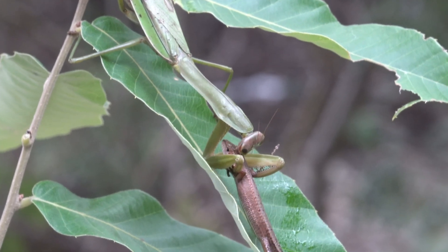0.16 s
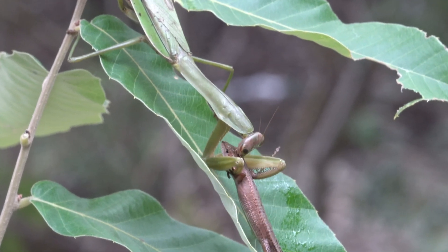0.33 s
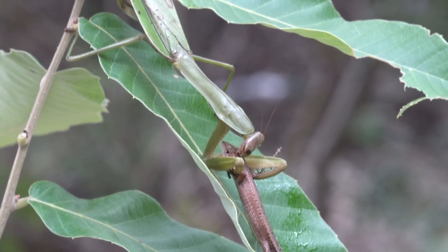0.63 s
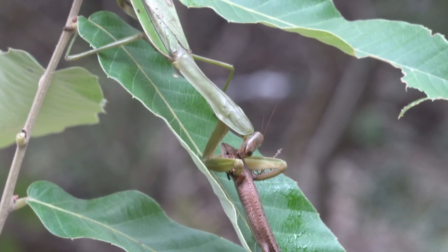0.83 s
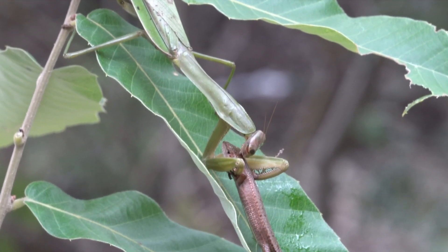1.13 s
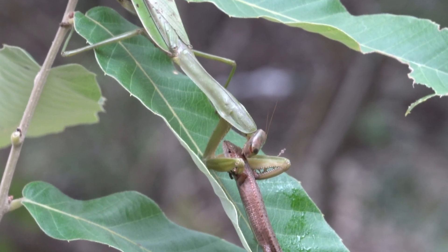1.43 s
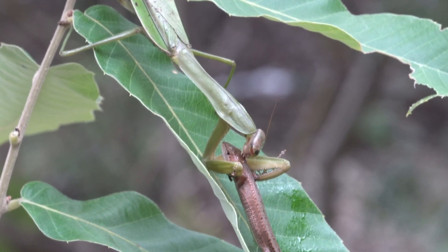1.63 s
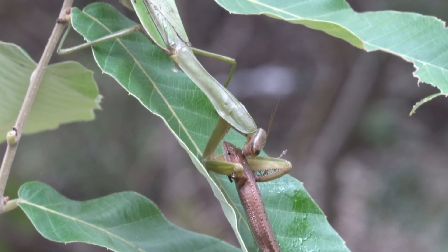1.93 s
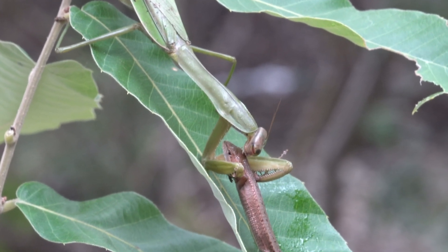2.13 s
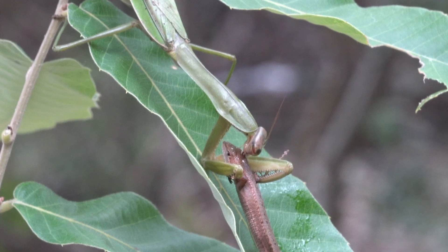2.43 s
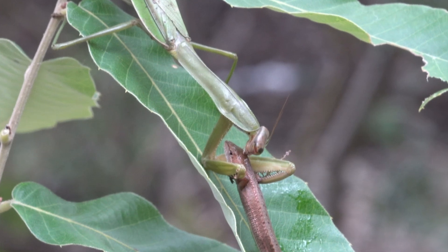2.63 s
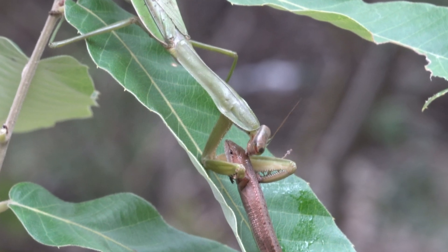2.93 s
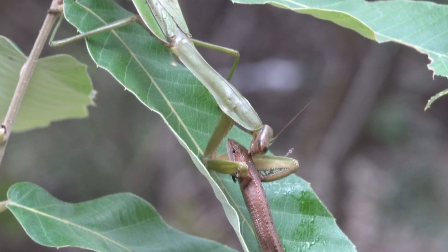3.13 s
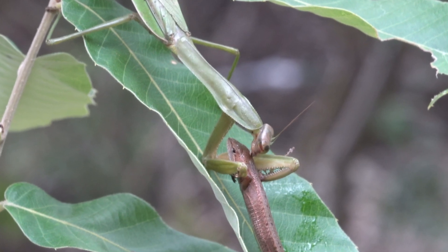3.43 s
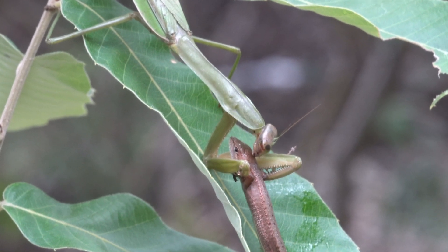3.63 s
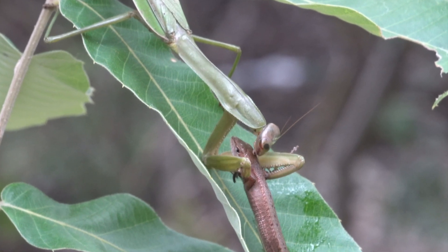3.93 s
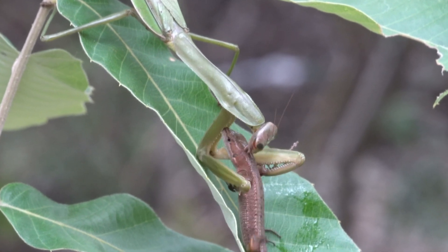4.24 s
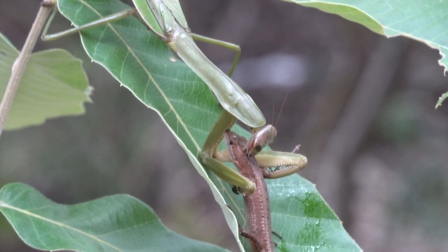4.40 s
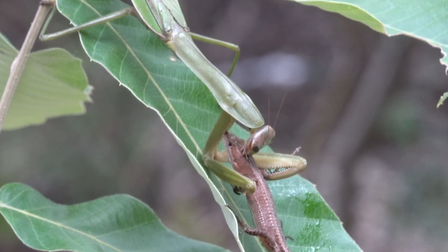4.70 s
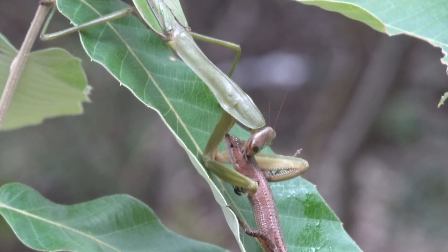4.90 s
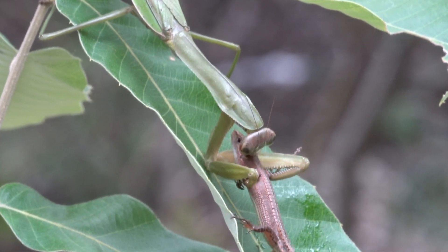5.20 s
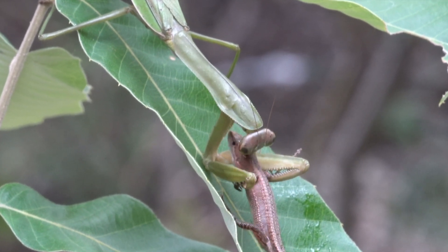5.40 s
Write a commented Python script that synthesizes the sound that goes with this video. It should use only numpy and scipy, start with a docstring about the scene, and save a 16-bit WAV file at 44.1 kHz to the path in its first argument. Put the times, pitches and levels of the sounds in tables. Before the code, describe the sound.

Fingers shift on a plastic camera housing, with dull low knocks, soft rubbing and tiny clicks over faint outdoor hiss, strongest just after four seconds.

```python
"""Camera handling in a quiet outdoor hush

Close to a mantis feeding among leaves, one most likely hears the hand-held camera, not the insect.
The shifting grip knocks, taps and rubs: jolts and tiny slips ring the low modes of the housing.
Its plastic seams tick, click, scrape and creak through brighter modes and those of the hollow shell.
Shaped noise makes the air and microphone hiss, and a faint high sine the electronics."""
import sys
import numpy as np
from scipy import signal
from scipy.fft import rfft, irfft
from scipy.io import wavfile
from scipy.ndimage import uniform_filter1d

SR = 44100
rng = np.random.default_rng(int(sys.argv[2]) if len(sys.argv) > 2 else 0)


def dump(signal):
    """Clip the signal to [-1, 1] and save it as 16-bit WAV at the path in sys.argv[1]."""
    limited = np.clip(np.atleast_2d(signal).T, -1, 1)
    pcm = np.round(limited * 32767).astype(np.int16)
    wavfile.write(sys.argv[1], SR, pcm)


N = 245195

# Clear knocks on the housing. Each row: start in seconds, level in dB before the trim, centre of the push in Hz.
KNOCK_HITS = [(0.069, -34.5, 230), (0.123, -40, 490), (0.419, -42.5, 250), (0.504, -35, 290),
              (0.581, -41, 280), (0.636, -34.5, 260), (0.683, -32, 290), (0.837, -27.5, 270),
              (0.926, -40.5, 300), (0.969, -41, 303), (1.075, -33.5, 347), (1.146, -41, 300),
              (1.41, -28, 386), (1.437, -37, 330), (1.48, -39, 300), (1.654, -42, 310), (1.725, -39, 290),
              (1.806, -42, 325), (1.873, -32, 440), (2.386, -46, 430), (2.448, -43, 315), (2.582, -39, 312),
              (2.779, -43, 315), (3.232, -44, 430), (4.046, -34, 450), (4.119, -28.5, 270),
              (4.129, -19.5, 436), (4.139, -19, 400), (4.148, -22, 190), (4.174, -23.5, 400),
              (4.318, -32, 320), (4.414, -30.5, 417), (4.613, -40, 310), (4.706, -42, 504),
              (5.014, -41.5, 447), (5.098, -35, 495), (5.162, -33, 260), (5.216, -35, 480),
              (5.236, -24.5, 530), (5.287, -29, 240), (5.304, -32, 480), (5.443, -42, 750)]
# How hard the grip slides: restless, then almost still, then shifted twice.
# Each row: time in seconds, level in dB before the offsets of rubbing and taps.
GRIP_SLIDE = [(0.0, -47.5), (0.2, -48.5), (0.33, -57), (0.66, -51.5), (1.0, -55), (1.56, -54.5),
              (1.66, -49), (2.3, -56.5), (3.05, -56), (3.4, -66.5), (3.67, -56.5), (3.9, -61), (3.99, -44),
              (4.42, -43.5), (4.96, -53), (5.25, -44), (5.38, -50), (5.56, -47.5)]
# A seam lets go and a panel clicks over. Each row: start in seconds, level of the seam in dB before
# its trim, level of the panel in dB before its trim, ring of the panel in Hz.
SEAM_SNAPS = [(0.051, -70, -51, 1350), (0.494, -72, -54, 1400), (0.598, -66, -53, 1350),
              (0.153, -55, -48, 1750), (0.195, -54, -48, 1050), (0.809, -54, -54, 1200),
              (1.162, -54, -43, 1650), (1.518, -60, -48, 1600), (2.030, -59, -52.5, 1800),
              (2.047, -59, -49.5, 1300), (2.101, -55.5, -47, 1000), (4.128, -49, -45, 1400),
              (4.141, -54, -44, 1900), (5.214, -54, -51, 1100)]
# Low modes of the housing. Each row: frequency in Hz, width in Hz, relative level in dB.
HOUSING_MODES = [(88.3, 14, -6.5), (143, 17, -17), (186.6, 14.6, -6.5), (219.6, 9, -14), (266.3, 17.3, -1),
                 (313.8, 34.5, 4.5), (341, 21, -3.5), (430, 39, 3), (510.6, 19, -5), (703, 27, -24),
                 (721, 22, -16), (1100, 67, -34), (1330, 110, -34)]
# Hollow ring of the shell. Each row: frequency in Hz, width in Hz, relative level in dB.
SHELL_MODES = [(743, 46, 8), (960, 57, -17.5), (1350, 55, -2), (1760, 130, -14.5)]
# Bright ring of the seams. Each row: frequency in Hz, width in Hz, relative level in dB.
SEAM_MODES = [(3000, 460, -8), (3710, 450, -1.5), (4380, 670, 0), (5380, 750, -4), (6140, 250, -5),
              (8360, 680, 8), (9700, 600, -1), (10800, 800, -16)]
LOW_SEAM_MODES, HIGH_SEAM_MODES = SEAM_MODES[:5], SEAM_MODES[5:]


def from_db(db):
    """Decibels to gain."""
    return 10 ** (np.asarray(db) / 20)


def rms_one(x):
    """Scale to unit rms."""
    return x / np.sqrt(np.mean(x ** 2) + 1e-20)


def in_time(rows):
    """A curve read at every sample."""
    s, value = np.transpose(rows)
    return np.interp(np.arange(N) / SR, s, value)


def at_hz(points, hz):
    """A spectrum read on a log-frequency axis."""
    f, value = np.transpose(points)
    return np.interp(np.log(hz), np.log(f), value)


def drift(rate_hz):
    """Slow random wander with spread 1: noise through two equal one-pole low-passes."""
    step = 40  # samples between points of the slow curve
    r = np.exp(-2 * np.pi * rate_hz * step / SR)
    noise = rng.standard_normal(N // step + 2002)
    slow = signal.lfilter([1], [1, -2 * r, r * r], noise)[2000:]  # skip the filter's start
    return np.interp(np.arange(N) / step, np.arange(len(slow)), rms_one(slow))


def resonate(x, hz, width_hz):
    """One resonance with gain close to 1 on top; a narrower one rings longer."""
    r = np.exp(-np.pi * width_hz / SR)
    feed = np.array([1, 0, -1]) * (1 - r * r) / 2
    feedback = [1, -2 * r * np.cos(2 * np.pi * hz / SR), r * r]
    return signal.lfilter(feed, feedback, x + 1e-18)  # the tiny offset avoids denormals


def body(force, modes, scatter_db=0):
    """Modes ring in parallel; random shares stand for the force landing in different places."""
    shares = from_db(scatter_db * rng.standard_normal(len(modes)))
    out = 0
    for share, (hz, width_hz, db) in zip(shares, modes):
        out = out + share * from_db(db) * resonate(force, hz, width_hz)
    return out


LANDING_SCATTER_DB = 3


def soften(x, hz):
    """Second-order low-pass."""
    return signal.sosfilt(signal.butter(2, hz, fs=SR, output="sos"), x)


def slips(per_s, spread_db):
    """Stick and slip: random tiny jolts of uneven size and either sign."""
    sizes_db = spread_db * np.minimum(rng.exponential(1, N), 4)
    jolts = from_db(sizes_db) * rng.choice([-1, 1], N)
    return jolts * (rng.random(N) < per_s / SR)


def jolt(grit, fade_s, size, rise_s):
    """One contact: an impulse and a short noisy skid that builds up and fades."""
    t = np.arange(size) / SR
    envelope = np.exp(-t / fade_s) * (1 - np.exp(-t / rise_s))
    skid = rng.standard_normal(size) * envelope
    return (t == 0) + grit * skid / np.linalg.norm(skid)


def add(out, s, sound, db, size):
    """Place a sound at a time, the rms of its loudest `size` samples at the given level."""
    at = round(s * SR)
    top = np.sqrt(uniform_filter1d(sound ** 2, size).max())
    out[at:at + len(sound)] += (sound * from_db(db) / top)[:N - at]


def stroke(start, end, edge_s=0.0048):
    """A gate with soft edges, half open at its start and end."""
    t = np.arange(N) / SR
    return np.clip(.5 + np.minimum(t - start, end - t) / edge_s, 0, 1)


def hush(level_db=-58):
    """Steady distant air and microphone hiss: shaped noise, less alike left and right in the treble."""
    # Outdoor air and hiss. Each row: frequency in Hz, relative density in dB per Hz.
    spectrum = [(15, -46), (25, -24), (113, -7), (260, -6), (331, 0.5), (390, -3), (470, -11), (650, -10),
                (922, -12), (1000, -13), (1670, -17.5), (2780, -23), (5450, -27.5), (14000, -32),
                (15600, -32)]
    # Likeness of left and right. Each row: frequency in Hz, correlation.
    likeness = [(1500, 1), (3000, 1), (5000, 0.98), (8000, 0.77), (13000, 0.48)]
    hz = np.maximum(np.arange(N // 2 + 1) * SR / N, 1)
    mid, side = rfft(rng.standard_normal((2, N))) * from_db(at_hz(spectrum, hz))
    alike = np.clip(at_hz(likeness, hz), 0, 1)
    pair = np.sqrt(1 + alike) * mid + np.sqrt(1 - alike) * side * [[1], [-1]]
    return from_db(level_db) * rms_one(irfft(pair, N))


def whine():
    """A thin steady tone of the electronics: one sine."""
    return from_db(-94) * np.sin(2 * np.pi * 14116 * np.arange(N) / SR)


def rubbing(trim_db=-3, per_s=500, soft_hz=1150, thin_hz=230):
    """Skin creeps over the housing in small uneven slips, too light to shake the lowest modes much."""
    thin = signal.butter(1, thin_hz, "high", fs=SR, output="sos")
    force = signal.sosfilt(thin, slips(per_s, spread_db=2))
    surge_db = 2 * drift(25)
    ring = rms_one(body(soften(force, soft_hz), HOUSING_MODES))
    return ring * from_db(in_time(GRIP_SLIDE) + trim_db + surge_db)


def ticks(trim_db=-2, soft_hz=11500, snap_low_db=3, light_low_db=-7):
    """A seam lets go with a bright snap; light ticks excite its low modes far less."""
    # Light ticks of a seam alone. Each row: start in seconds, level in dB before the trim.
    light_ticks = [(0.271, -61), (1.756, -61), (2.063, -62), (2.165, -63), (4.48, -55), (4.63, -60.5),
                   (4.645, -59), (5.115, -57), (5.163, -58)]
    # one seam ratchets along: five even ticks, 15 ms apart
    events = [(.1665 + k * .015, -56, snap_low_db) for k in range(5)]
    events += [(s, seam_db, snap_low_db) for s, seam_db, panel_db, hz in SEAM_SNAPS]
    events += [(s, db, light_low_db) for s, db in light_ticks]
    out = np.zeros(N)
    for s, db, low_db in events:
        force = jolt(grit=1.8, fade_s=0.0013, size=2000, rise_s=0.00081)
        low = from_db(low_db) * body(force, LOW_SEAM_MODES, LANDING_SCATTER_DB)
        high = body(force, HIGH_SEAM_MODES, LANDING_SCATTER_DB)
        add(out, s, soften(low + high, soft_hz), db + trim_db, size=128)
    return out


def clacks(trim_db=-1, width_hz=230, shell_db=-7, housing_db=-3):
    """A panel clicks over: its own short ring, with some of the shell's and the housing's."""
    out = np.zeros(N)
    for s, seam_db, panel_db, hz in SEAM_SNAPS:
        force = jolt(grit=0.65, fade_s=0.0021, size=2000, rise_s=0.00056)
        panel = resonate(force, hz, width_hz)
        shell = from_db(shell_db) * body(force, SHELL_MODES)
        housing = from_db(housing_db) * body(force, HOUSING_MODES)
        add(out, s, soften(panel + shell + housing, hz=2000), panel_db + trim_db, size=128)
    return out


def push_on(contact, hz, db, soft_hz=720):
    """A soft fingertip's force around one pitch; a harder push is shorter, so its band is wider."""
    width_hz = 125 * 2 ** ((db + 40) / 17)  # 125 Hz at -40 dB, doubling every 17 dB
    return soften(resonate(contact, hz, width_hz), soft_hz)


def knocks(trim_db=-1, thud_db=-8, thud_growth=.4, skid=1.05):
    """Soft pushes ring the housing and settle; higher ones favour higher modes, heavy ones recoil low."""
    # the finger settles again after each knock, later, weaker and duller
    settle_s, settle_loss_db, settle_pitch_share = .024, 9, .9
    settling = [(s + settle_s, db - settle_loss_db, hz * settle_pitch_share) for s, db, hz in KNOCK_HITS]
    heaviest_db = max(db for s, db, hz in KNOCK_HITS)
    out = np.zeros(N)
    for s, db, hz in KNOCK_HITS + settling:
        contact = jolt(grit=skid, fade_s=.007, size=8000, rise_s=.003)
        recoil_db = thud_db + thud_growth * (db - heaviest_db)
        recoil = from_db(recoil_db) * resonate(contact, hz=85, width_hz=150)
        force = push_on(contact, hz, db) - recoil
        add(out, s, body(force, HOUSING_MODES, LANDING_SCATTER_DB), db + trim_db, size=256)
    return out


def scuffs(offset_db=-24, growth=.6, usual_db=-35):
    """Each knock drags a little skin over the hollow shell; this grows more slowly than the knock."""
    out = np.zeros(N)
    for s, db, hz in KNOCK_HITS:
        force = jolt(grit=4, fade_s=.02, size=4000, rise_s=.003)
        ring = body(soften(force, hz=1300), SHELL_MODES, LANDING_SCATTER_DB)
        scuff_db = usual_db + offset_db + growth * (db - usual_db)
        add(out, s, ring, scuff_db, size=256)
    return out


def taps(skid=0.92, per_s=8, offset_db=4.5, spread_db=2.5, push_hz=315):
    """The sliding fingers catch at uneven moments, with levels that follow the grip's slide."""
    out = np.zeros(N)
    chance = rng.random((100, 2))
    times = np.cumsum(.5 + chance[:, 0]) / per_s
    slide_db = np.interp(times, *np.transpose(GRIP_SLIDE))
    levels_db = slide_db + offset_db + spread_db * (2 * chance[:, 1] - 1)
    for s, db in zip(times, levels_db):
        if s >= N / SR:
            break
        contact = jolt(grit=skid, fade_s=.007, size=6000, rise_s=.003)
        ring = body(push_on(contact, push_hz, db), HOUSING_MODES, LANDING_SCATTER_DB)
        add(out, s, ring, db, size=256)
    return out


def scraping(per_s=2000):
    """Plastic slides on plastic: dense slips into the same seams and shell."""
    # Dry strokes. Each row: start in seconds, end in seconds, level of the high seam modes in dB,
    # level of the low seam modes in dB, level of the hollow shell in dB.
    strokes = [(0.136, 0.225, -74, -66, -55.5), (1.706, 1.78, -75.5, -76, -63),
               (3.963, 4.075, -79, -75, -55.5), (4.06, 4.127, -65, -64.5, -56),
               (4.127, 4.18, -70, -61, -50), (4.225, 4.275, -74, -70, -58), (4.453, 4.513, -67.5, -70, -65),
               (5.227, 5.256, -66, -62, -53.5), (5.297, 5.335, -61, -57.5, -53)]
    force = slips(per_s, spread_db=3) * from_db(2 * drift(70))
    high = rms_one(soften(body(force, HIGH_SEAM_MODES), hz=11800))
    low = rms_one(soften(body(force, LOW_SEAM_MODES), hz=7800))
    hollow = rms_one(soften(body(force, SHELL_MODES), hz=2560))
    out = np.zeros(N)
    for start, end, high_db, low_db, hollow_db in strokes:
        mix = from_db(high_db) * high + from_db(low_db) * low + from_db(hollow_db) * hollow
        out += stroke(start, end, edge_s=.012) * mix
    return out


def creaks(shell_db=-8, soft_hz=1000, rough_db=3):
    """Under pressure the slips lock into a nearly regular train of rounded jolts that squeaks."""
    # Each row: start in seconds, end in seconds, first slip rate in Hz, last slip rate in Hz, level in dB.
    squeaks = [(0.157, 0.185, 496, 515, -41), (0.194, 0.222, 505, 531, -39.5),
               (5.211, 5.263, 499, 508, -50)]
    out, t = np.zeros(N), np.arange(N) / SR
    for start, end, first_hz, last_hz, db in squeaks:
        jitter = 1 + .05 * drift(120)
        rate_hz = np.interp(t, [start, end], [first_hz, last_hz]) * jitter
        # one jolt each time the running count of slips passes a whole number
        train = np.diff(np.floor(np.cumsum(rate_hz) / SR), prepend=0)
        jolts = train * stroke(start, end) * from_db(rough_db * drift(110))
        force = soften(soften(jolts, soft_hz), soft_hz)
        ring = body(force, HOUSING_MODES) + from_db(shell_db) * body(force, SHELL_MODES)
        add(out, 0, ring, db, size=512)
    return out


def scene():
    """Sound carried by the housing reaches both microphones alike; only the hush is stereo."""
    air = hush() + whine()
    grip = rubbing() + knocks() + scuffs() + taps()
    plastic = ticks() + clacks() + scraping() + creaks()
    return air + grip + plastic


def record(dry):
    """A steep elliptic low-pass cuts the top above 15.73 kHz."""
    return signal.sosfilt(signal.ellip(12, .1, 80, 15730, fs=SR, output="sos"), dry)


dry = scene()
out = record(dry)
dump(out)
```